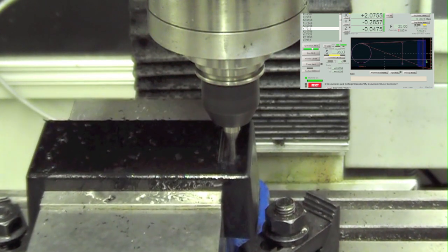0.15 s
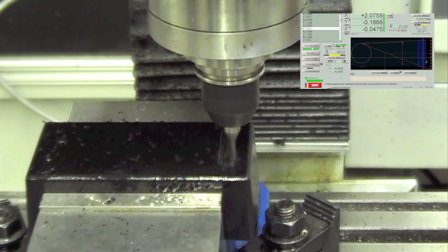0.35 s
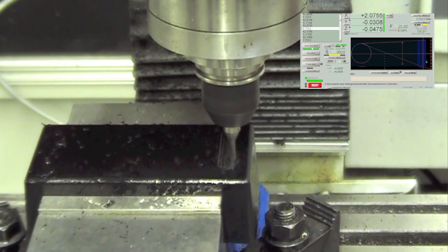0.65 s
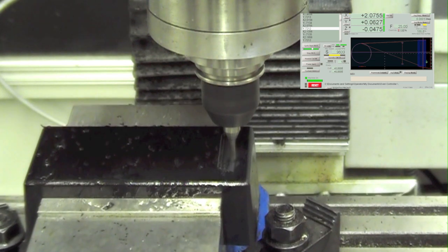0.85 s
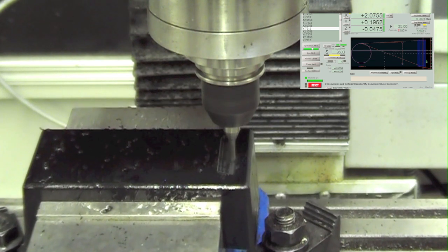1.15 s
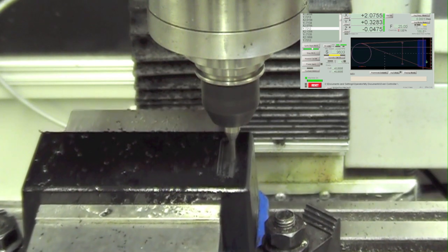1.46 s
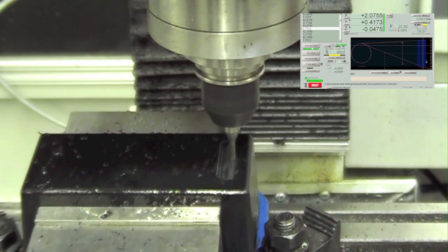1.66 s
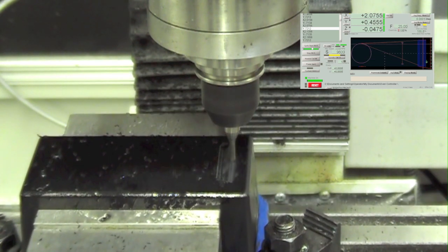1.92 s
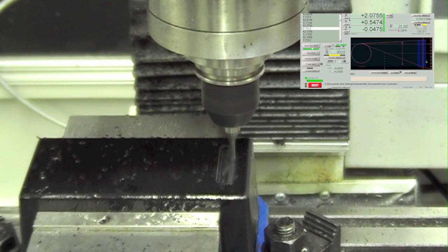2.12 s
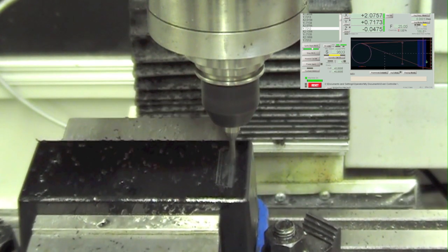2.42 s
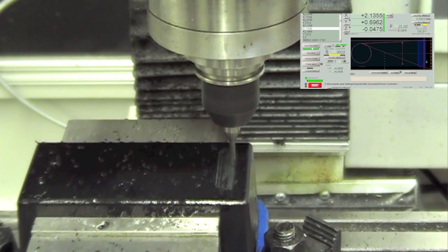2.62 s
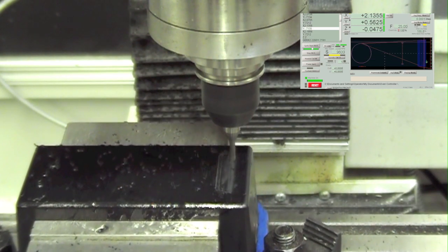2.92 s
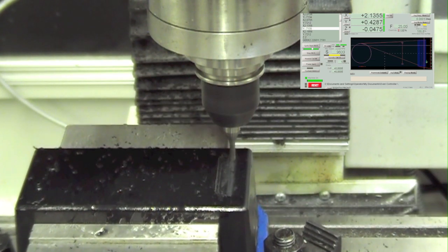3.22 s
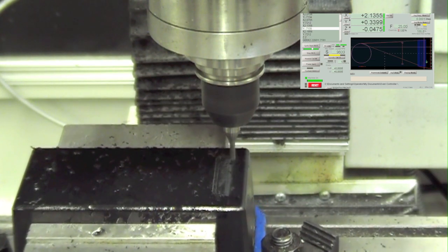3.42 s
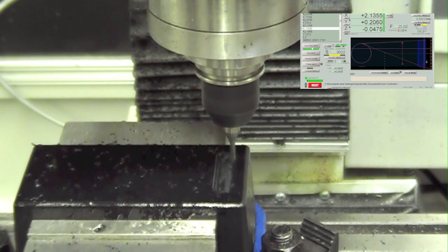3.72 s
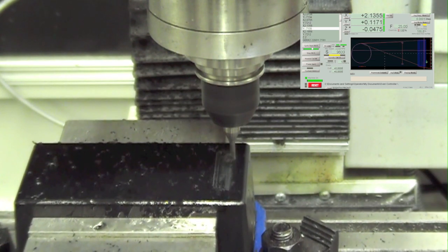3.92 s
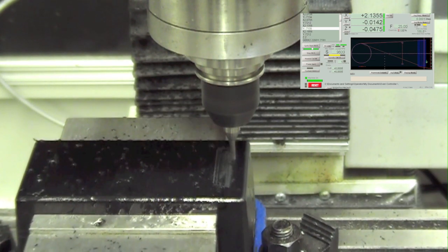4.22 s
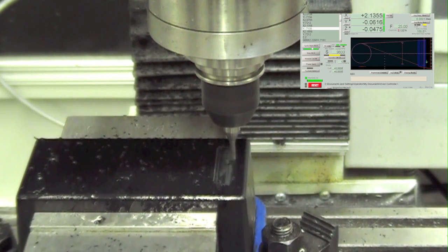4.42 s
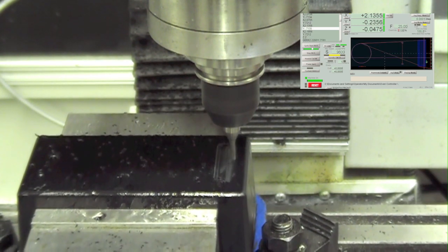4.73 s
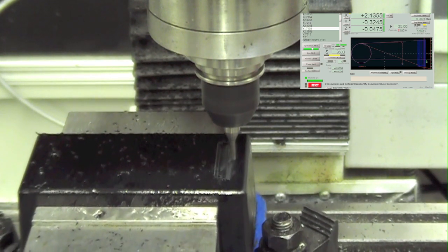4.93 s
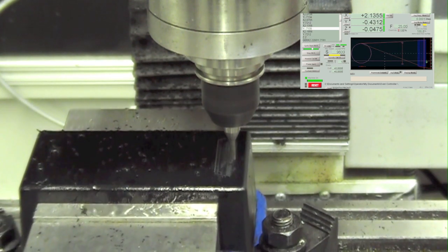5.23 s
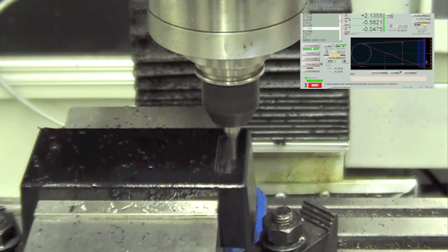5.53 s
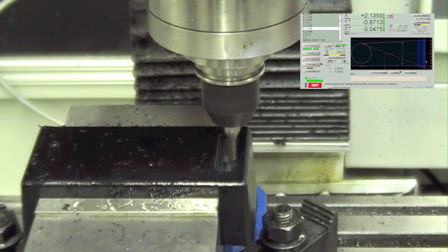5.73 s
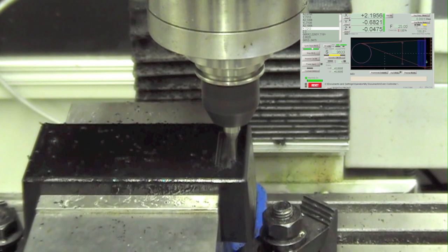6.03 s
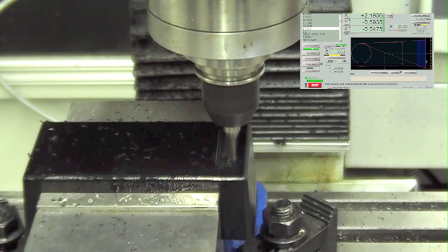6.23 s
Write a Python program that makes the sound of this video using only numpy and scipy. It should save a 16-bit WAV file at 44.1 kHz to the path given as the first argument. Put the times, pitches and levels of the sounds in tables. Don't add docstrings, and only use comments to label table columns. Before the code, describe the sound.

Harsh compressed-air blasts come and go over a constant machine whine and motor roar, which swells back up each time the air stops.

```python
import sys
import numpy as np
from scipy import signal
from scipy.fft import rfft, irfft, next_fast_len
from scipy.io import wavfile
from scipy.ndimage import uniform_filter1d

SR = 44100
rng = np.random.default_rng(int(sys.argv[2]) if len(sys.argv) > 2 else 0)


def field_ratio(decibels):
    return 10 ** (np.asarray(decibels, dtype=float) / 20)


def to_wav(sig):
    pcm = np.clip(np.atleast_2d(sig), -1, 1) * 32767
    pcm = np.round(pcm).astype(np.int16)
    wavfile.write(sys.argv[1], SR, pcm.T)


N = 280476
SIZE = next_fast_len(N)
HZ = np.maximum(np.arange(SIZE // 2 + 1) * SR / SIZE, 1)

# t/s, load (0 singing gears, 1 settled), roar level/dB
SPINDLE_STATE = [(0, .72, -16.5), (.7, 0.48, -14.5), (1.05, .12, -15), (1.6, .2, -14), (2.1, 0, -15),
                 (2.6, 0, -15.5), (3.2, .2, -15), (3.5, 1, -13), (3.9, 1, -16), (4.2, 1, -14.5),
                 (6.36, 1, -15.5)]
# t/s, turn rate f/Hz
SPINDLE_TURNS = [(0, 173.8), (3.3, 173.8), (3.5, 173.9), (6.36, 173.9)]
# multiple of the turn rate, singing level/dB, settled level/dB
SPINDLE_LINES = [(1, -33, -34), (6, -45, -25), (7, -40, -34), (8, -41, -33), (9, -42, -35), (10, -35, -35),
                 (12, -26, -33), (13, -43, -32), (17, -45, -34), (18, -35, -39), (19, -36, -39),
                 (20, -38, -38), (24, -37, -35), (26, -32, -41), (28, -39, -41), (32, -38, -43),
                 (34, -36, -52), (36, -40, -52), (38, -42, -53),
                 (44, -40, -54), (45, -36, -48), (46, -36, -48), (47, -32, -52), (48, -33, -53),
              (50, -27, -51), (51, -41, -46), (52, -38, -52), (54, -39, -56), (56, -39, -49),
              (57, -45, -57), (58, -36, -51), (60, -42, -56), (62, -37, -55), (64, -42, -58),
              (66, -47, -65), (68, -53, -64), (70, -51, -67), (79, -50, -65)]
# multiple of the blade rate, level/dB, level waver/dB, phase waver/rad
FAN_TONES = [(1, -53, 1.5, .3), (4, -41, 1.5, .3), (5, -30, 1.0, .2), (6, -26.5, .6, .1)]
# f/Hz, level/dB
MIXING_TONES = [(869, -37), (1116, -37), (2145.7, -36), (2203, -40), (4290.5, -39), (6435, -42),
                (8226, -38)]
# f/Hz, level/dB per Hz
ROAR_COLOUR = [(30, -35), (100, -26.5), (166, -16.5), (420, -11.5), (600, -7.5), (800, -3.5), (1300, -5),
               (1760, -6.5), (2330, -9.5), (3360, -9), (5210, -11.5), (8530, -9), (14200, -27.5),
               (14900, -35)]
# f/Hz, width/Hz, level/dB
MACHINE_RINGS = [(272.3, 67, 3.5), (561.3, 42, 5), (841, 28, -8.5), (1080, 210, -9), (1435, 26, -5.5),
                 (1580, 33, -3.5), (1750, 51, 0), (2510, 53, -11), (2950, 32, -25),
                 (3350, 370, -10), (4620, 530, -17.5), (8460, 2200, -12.5), (10950, 770, -3),
              (13300, 300, -18)]
# t/s, level/dB
GUARD_ECHOES = [(.0031, -21.5), (.0047, -58), (.0074, -16.5), (0.0109, -23.5), (0.0175, -15)]
# open t/s, shut t/s, opening level/dB, crest level/dB, level it sags or swells to/dB
VALVE_OPENINGS = [
    (-.2, 0.246, 4, 4.5, -1.5),
    (0.575, 0.88, -18.5, -21, -23),
    (.89, 1.11, -10, -11, -13),
    (1.108, 1.984, 1, 7.5, 3.5),
    (4.007, 4.249, -31, -23.5, -19),
    (4.259, 6.5, 4.5, 5.5, 4.5),
]
# flow level/dB, low flank level/dB, top level/dB
FLOW_COLOUR = [(-19, 6.5, -5.5), (-6, 1.5, -7), (4.5, 0, 3), (8.5, -3, -5)]
# f/Hz, level/dB per Hz
JET_COLOUR = [(1180, -26.5), (2000, -20), (2530, -18.5), (3420, -11.5), (6160, -10), (7840, -5), (9080, -3),
              (10400, -5), (13400, -12.5), (15400, -22.5), (15800, -63)]
# f/Hz, width/Hz, mean level over the jet/dB, swing/dB, strongest at/mm
POCKET_RINGS = [(5590, 450, 3.5, 3.5, 2.5), (6660, 135, 6, 3.5, -7), (7020, 510, 3.5, 1.5, 4),
                (8070, 490, 5.5, 1.6, 8), (8800, 430, 4, 5, -7), (9400, 580, 5.5, 1.5, 5.5),
                (11100, 380, 1, 3, -15), (11340, 180, 3, 2, -1), (12900, 270, 7, 7, -1),
                (13800, 360, 5.5, 9, 0.5)]
# t/s, position/mm
TABLE_TRAVEL = [(0, -9.6), (2.52, 18.6), (5.85, -18.5), (6.36, -13)]
# f/Hz, level/dB
MACHINE_WIDTH = [(60, -29), (110, -78), (200, -106), (380, -63), (700, -21), (1290, -28), (2380, -21.5),
                 (4400, -13.5), (8120, -5.5), (15000, -24)]
# f/Hz, level/dB
JET_WIDTH = [(2000, -33), (4000, -58), (5200, -22), (6000, -10), (7000, -10.5), (8500, -10), (10000, -9),
             (12000, -6.5), (15000, -20)]
# f/Hz, lead/rad
PORT_LEAD = [(0, 0.02), (5940, 0.091), (6290, -0.15), (7060, -0.24), (7920, 0.099), (8350, -1.5),
             (8610, -0.44), (9560, -1.45), (9820, -0.5), (10900, -1.2), (11500, -0.34), (12100, -0.62),
             (12700, -0.1), (15900, 0.25)]
# f/Hz, level/dB
PORT_TILT = [(60, 4), (180, 1), (550, 0.4), (1650, -1), (4970, -0.2), (15000, -2)]

BLADE_HZ = 117.33
LINE_WAVER_DB, ROAR_WAVER_DB = .8, .6
OPEN_S, OPEN_DB, CREST_S, SAG_S = .022, 18, 0.23, 0.93
SHUT_S, SHUT_DB, TAIL_S, TAIL_DB = 0.027, 17.5, 0.1, 50
RIPPLE_MM = 27.6
TOP_LAG_S = .04
SCATTER_DB, SCATTER_LOSS_DB_MS = -19, .7
PORTS_APART_HZ = 7000
HELD_DB, RELEASE_DB_S, ATTACK_S, SENSE_S = -12.0, 65.5, 0.0044, 0.018
LATE_SHARE, LATE_S = 0.056, 1
SELF_NOISE_DB = -45


def in_time(rows):
    s, *columns = np.transpose(rows)
    return [np.interp(np.arange(N) / SR, s, column) for column in columns]


def at_hz(points, hz=HZ):
    p = np.array(points, float)
    return np.interp(np.log(hz), np.log(np.maximum(p[:, 0], 1)), p[:, 1])


def rms_one(x):
    return x / np.sqrt(np.mean(x ** 2) + 1e-20)


def drift(rate):
    r = np.exp(-80 * np.pi * rate / SR)
    slow = signal.lfilter([1], [1, -2 * r, r * r], rng.standard_normal(N // 40 + 2002))[2000:]
    return np.interp(np.arange(N) / 40, np.arange(len(slow)), rms_one(slow))


def settle(x, seconds):
    r = np.exp(-1 / (seconds * SR))
    return signal.lfilter([1 - r], [1, -r], x - x[0]) + x[0]


def resonance(hz, width):
    return 1 / np.sqrt(1 + (2 * (HZ - hz) / width) ** 2)


def heard(spectrum):
    return irfft(spectrum, SIZE)[:, :N]


def port_noise(width_db):
    mid, side = rfft(rng.standard_normal((2, SIZE)))
    sign = np.array([[1], [-1]])
    share = field_ratio(at_hz(width_db))
    pair = (mid + sign * share * side) / np.sqrt(1 + share ** 2)
    return pair * np.exp(.5j * sign * at_hz(PORT_LEAD)) * field_ratio(.5 * sign * at_hz(PORT_TILT))


def tone(angle, level_db, hz):
    lag = rng.normal(0, 1) * 0.44 * field_ratio(at_hz(MACHINE_WIDTH, hz)) * np.array([[1], [-1]])
    return np.sqrt(2) * field_ratio(level_db) * np.sin(angle + rng.uniform(0, 2 * np.pi) + lag)


def guards():
    echoes = sum(field_ratio(db) * np.exp(-2j * np.pi * HZ * s) for s, db in GUARD_ECHOES)
    return (1 + echoes) / np.sqrt(1 + sum(field_ratio(2 * db) for s, db in GUARD_ECHOES))


def roar(turns, roar_db):
    rings = sum(field_ratio(db + 6.0) * resonance(hz, width) ** 2 for hz, width, db in MACHINE_RINGS)
    noise = port_noise(MACHINE_WIDTH) * field_ratio(at_hz(ROAR_COLOUR)) * (1 + rings) * guards()
    treble = 1 / (1 + (4500 / HZ) ** 4)
    low = heard(noise * (1 - treble))
    high = heard(noise * treble)
    scale = np.sqrt(np.mean((low + high) ** 2))
    throb = 1 + 0.045 * np.sin(2 * np.pi * np.cumsum(turns) / SR)
    low_gain = field_ratio(roar_db + ROAR_WAVER_DB * drift(5.8))
    high_gain = field_ratio(-16.0 + 0.16 * drift(7.5)) * throb
    return (low_gain * low + high_gain * high) / scale


def fan(load):
    cycle = 2 * np.pi * np.arange(N) / SR
    blades = beats = 0
    for k, db, waver_db, waver_rad in FAN_TONES:
        angle = round(k) * BLADE_HZ * cycle + waver_rad * drift(2.4)
        blades = blades + tone(angle, db + waver_db * drift(3.2), k * BLADE_HZ)
    for hz, db in MIXING_TONES:
        beats = beats + tone(hz * cycle + 0.3 * drift(5.0), db + 1.2 * drift(3.1), hz)
    return field_ratio(2.2 * load - 0.33) * blades + beats


def whine(turns, load):
    angle = 2 * np.pi * np.cumsum(turns) / SR
    out = 0
    for order, singing_db, settled_db in SPINDLE_LINES:
        level_db = singing_db + load * (settled_db - singing_db) + LINE_WAVER_DB * drift(2.1)
        out = out + tone(round(order) * angle, level_db, order * turns[0])
    return out


def air_flow():
    t = np.arange(N) / SR
    flow = 1e-4
    for opens, shuts, first_db, crest_db, last_db in VALVE_OPENINGS:
        rise_db = np.interp(t - opens, [-OPEN_S, 0, CREST_S], [first_db - OPEN_DB, first_db, crest_db],
                            left=-90)
        past_crest = np.maximum(t - opens - CREST_S, 0)
        sag_db = (last_db - crest_db) * (1 - np.exp(-past_crest / SAG_S))
        loss_db = np.interp(t - shuts, [0, SHUT_S, TAIL_S], [0, SHUT_DB, TAIL_DB], right=90)
        flow = flow + field_ratio(rise_db + sag_db - loss_db)
    return 20 * np.log10(flow)


def scatter(x, place_mm, count=32):
    taps = np.zeros((2, 2, SIZE))
    ms = rng.uniform(1.2, 12, (2, 2, count))
    strength = field_ratio(SCATTER_DB - SCATTER_LOSS_DB_MS * ms) * rng.normal(0, 1, ms.shape)
    np.put_along_axis(taps, (ms * SR / 1000).astype(int), strength, axis=2)
    echoes = rfft(taps)
    apart = 1 / (1 + (PORTS_APART_HZ / HZ) ** 6)
    echoes = echoes[:, :1] + apart * (echoes - echoes[:, :1])
    first, second = irfft(echoes * rfft(x, SIZE), SIZE)[..., :N]
    angle = np.pi * place_mm / RIPPLE_MM
    return x + np.cos(angle) * first + np.sin(angle) * second


def nozzle():
    blast_db = air_flow()
    place_mm, = in_time(TABLE_TRAVEL)
    flows, lows, tops = np.transpose(FLOW_COLOUR)
    low_db = np.interp(blast_db, flows, lows)
    top_db = settle(np.interp(blast_db, flows, tops), TOP_LAG_S)
    noise = port_noise(JET_WIDTH) * field_ratio(at_hz(JET_COLOUR)) / (1 + (250 / HZ) ** 2)
    low = 1 / (1 + (HZ / 5800) ** 8)
    top = 1 / (1 + (11500 / HZ) ** 16)
    out = field_ratio(low_db + 0.27 * drift(30.0)) * heard(noise * low)
    out += field_ratio(0.77 * drift(3.4)) * heard(noise * (1 - low - top))
    out += field_ratio(top_db + 0.98 * drift(15.0)) * heard(noise * top)
    for hz, width, mean_db, swing_db, best_mm in POCKET_RINGS:
        swing = np.cos(2 * np.pi * (place_mm - best_mm) / RIPPLE_MM)
        ring_db = mean_db + swing_db * swing + top_db * (hz > 11500)
        excess = np.maximum(field_ratio(ring_db + 1.5 * drift(12.4)) - 1, 0)
        out += excess * heard(noise * resonance(hz, width) ** 2)
    gusts = field_ratio(blast_db + 0.76 * drift(3.2) + 0.43 * drift(59))
    return gusts * scatter(out, place_mm) / np.std(heard(noise)) * 0.78


def scene():
    turns, = in_time(SPINDLE_TURNS)
    load, roar_db = in_time(SPINDLE_STATE)
    return roar(turns, roar_db) + fan(load) + field_ratio(0.5) * whine(turns, load) + nozzle()


def top_cut(x):
    return signal.sosfilt(signal.butter(12, 15950, fs=SR, output="sos"), x)


def record(dry):
    power = uniform_filter1d(np.mean(dry ** 2, axis=0), max(int(SENSE_S * SR), 1))
    climb = RELEASE_DB_S * np.arange(N) / SR
    held_db = np.maximum.accumulate(10 * np.log10(power + 1e-12) + climb) - climb
    smooth_db = (1 - LATE_SHARE) * settle(held_db, ATTACK_S) + LATE_SHARE * settle(held_db, LATE_S)
    band = signal.butter(2, [220, 1700], "band", fs=SR, output="sos")
    hiss = signal.sosfilt(band, rng.standard_normal((2, N)))
    wet = dry * field_ratio(HELD_DB - smooth_db) + field_ratio(SELF_NOISE_DB) * rms_one(hiss)
    return top_cut(1.281 * np.tanh(wet / 1.316))


dry = scene()
out = record(dry)
to_wav(out)
```